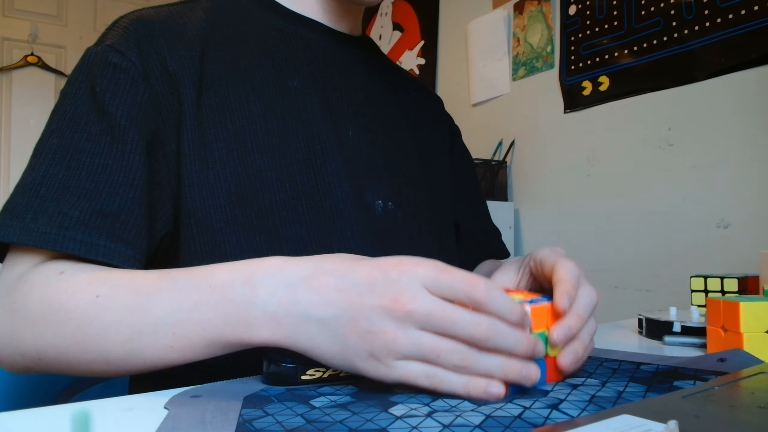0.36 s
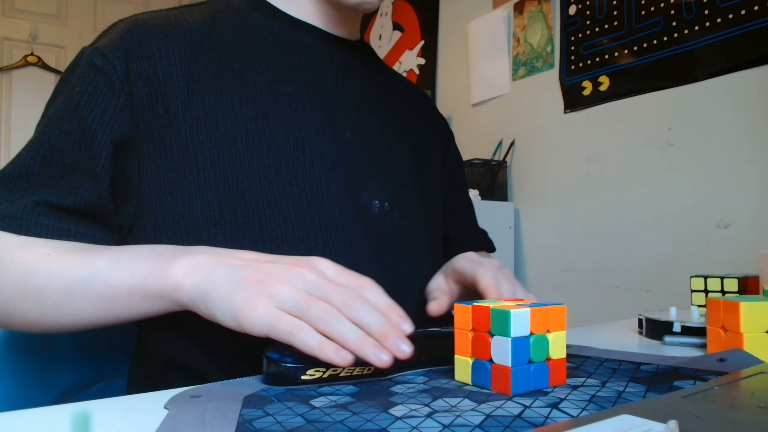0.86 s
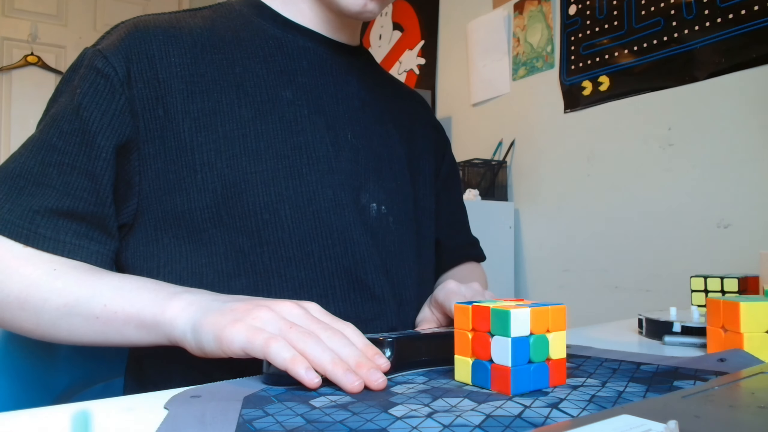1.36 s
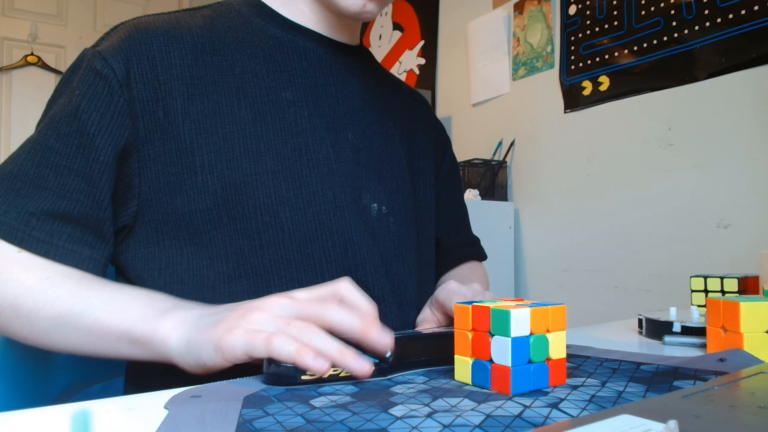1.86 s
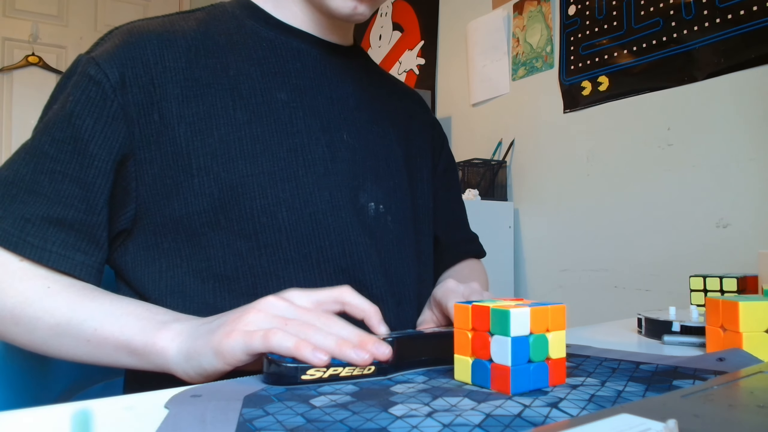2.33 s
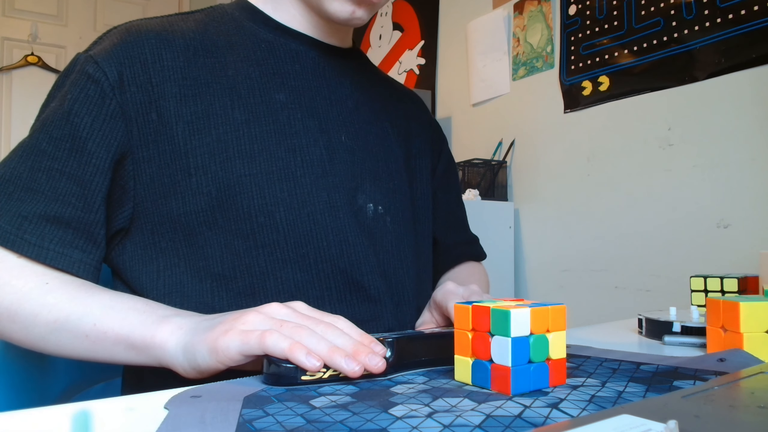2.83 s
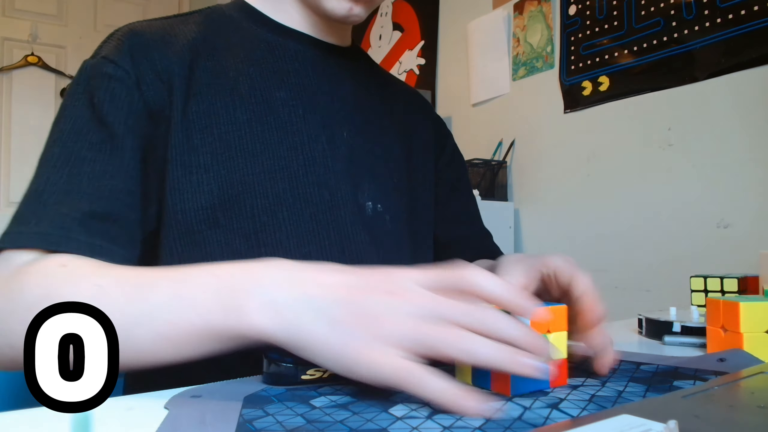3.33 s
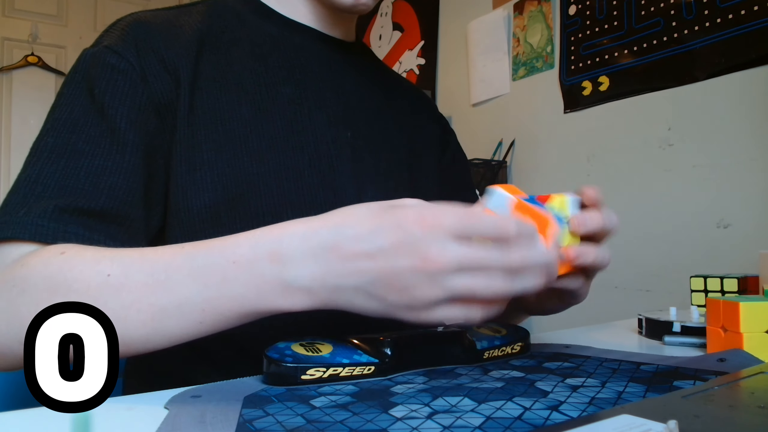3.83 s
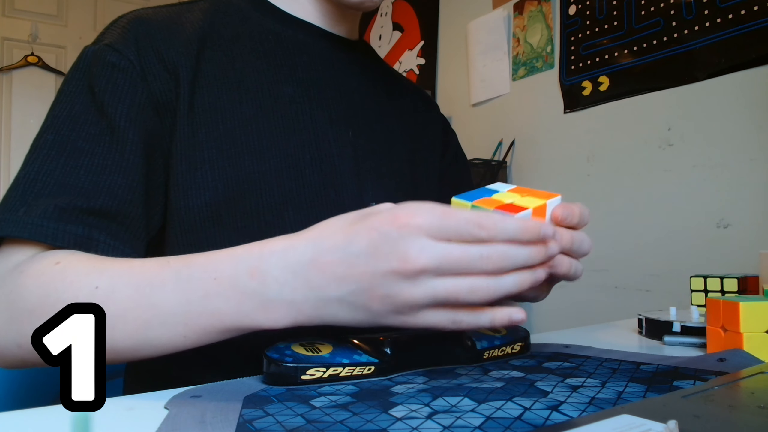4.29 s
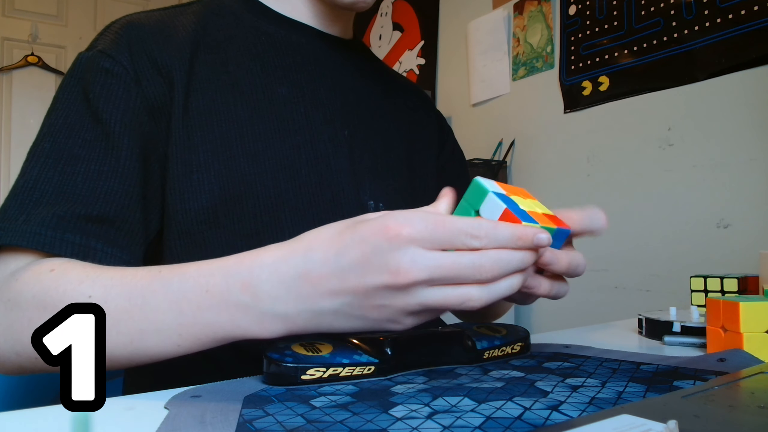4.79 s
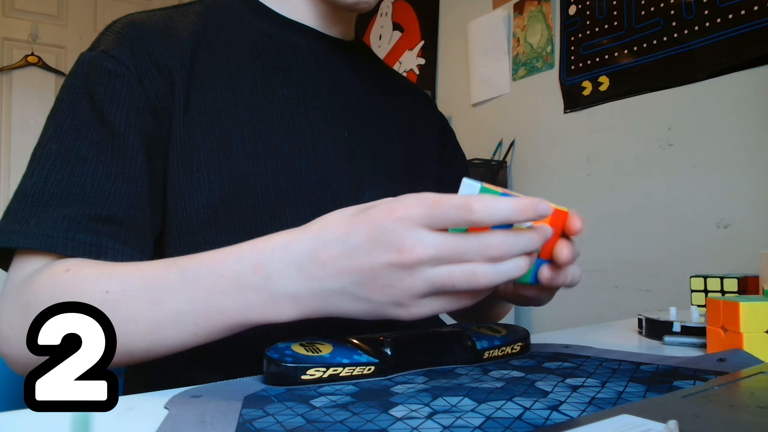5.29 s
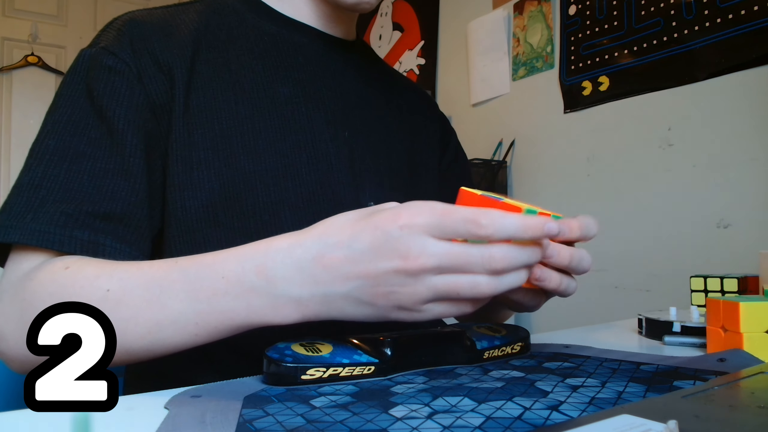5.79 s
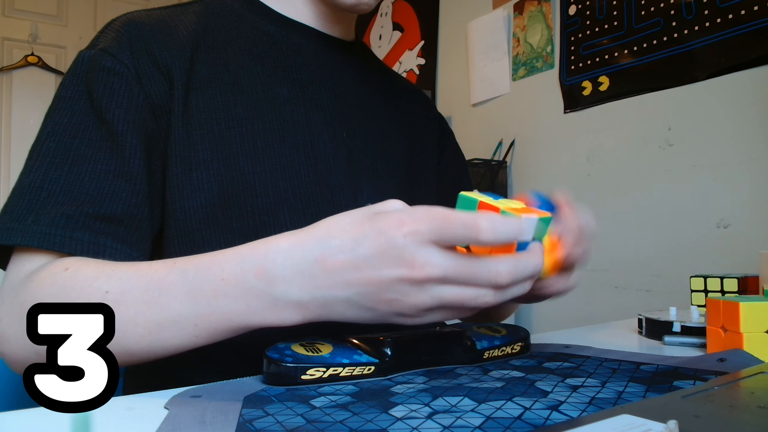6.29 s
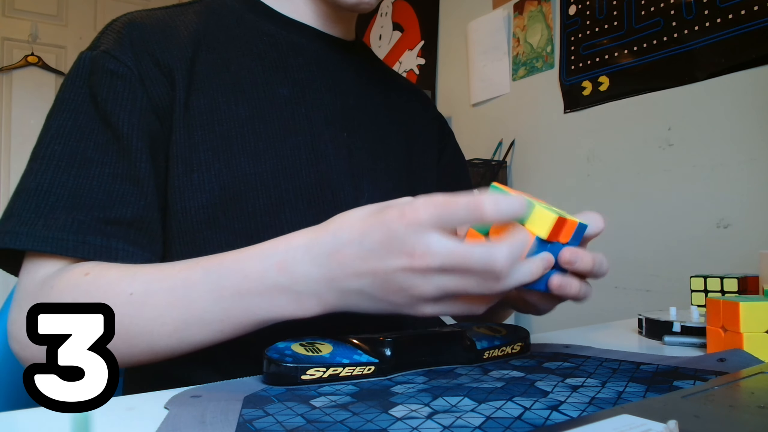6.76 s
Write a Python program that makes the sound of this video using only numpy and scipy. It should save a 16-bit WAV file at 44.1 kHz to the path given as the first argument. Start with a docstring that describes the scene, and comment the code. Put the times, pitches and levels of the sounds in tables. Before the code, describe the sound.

Close desk microphone, small room, quiet steady fan. First a dull double thump as a cube is put down, then a soft bump and skin rustle. After a quiet second come several hard finger taps and one strong low knock. Another lull, a brushing grab, then rapid crisp plastic snaps and short gritty scrapes, growing denser and louder towards the end.

```python
"""Over a faint fan hiss a plastic puzzle cube is set down on a desk mat, hands and fingertips land on a
timer pad, then the cube is snatched up and its layers are flicked round in bursts of sharp clicks.
Knocks are ragged contacts ringing plastic modes; scraping rings the cube's modes with grainy noise;
skin and sleeves are grainy filtered noise; thumps and leaning arms ring desk modes, with deep wobbles below.
A small furnished room; the microphone stands on the same desk."""
import sys
import numpy as np
from scipy import signal
from scipy.fft import rfft, irfft, next_fast_len
from scipy.io import wavfile
from scipy.ndimage import uniform_filter1d

SR = 44100
rng = np.random.default_rng(int(sys.argv[2]) if len(sys.argv) > 2 else 0)


def file_out(sig):
    """Save sig as 16-bit WAV at sys.argv[1]."""
    # one column per channel
    cols = np.atleast_2d(sig).T
    # limit, then scale
    lim = np.clip(cols, -1, 1)
    pcm = np.round(lim * 32767).astype(np.int16)
    wavfile.write(sys.argv[1], SR, pcm)


def ratio(d):
    """dB to gain"""
    e = np.asarray(d, float) / 20
    return 10 ** e


N = 314874

# cube body modes: (nominal frequency [Hz], relative level [dB], t60 [s])
CUBE_MODES = [(670, -12, 0.0013), (1121, 0, 0.022), (1450, 12, 0.0022), (2350, 7, 0.0067),
              (2500, 4, 0.0027), (3473, 4, 0.0094), (4260, 6, 0.005), (4906, 5, 0.0018),
              (5523, 4.5, 0.0058), (6037, -1, 0.0087), (6950, 0.5, 0.006), (7130, -10, 0.0052)]
# layer flicks: (loudest moment [s], relative level [dB], time to die 20 dB [s], under 5 ms swells as 5 ms)
FLICKS = [(3.6, -30.5, 0.1), (3.632, -20.5, 0.0758), (3.88, -26, 0.0551), (4.03, -34, 0.08),
          (4.45, -47.5, 0.86), (4.5, -33.5, .045), (4.583, -24.5, 0.02), (4.97, -42.5, 0.34),
          (5.035, -14.5, 0.05), (5.222, -23.5, 0.035), (5.43, -25, 0.07), (5.48, -13.5, 0.0075),
          (5.557, -30, 0.0568), (5.66, -35, 0.02), (5.91, -30, 0.02), (6.07, -45, 0.35), (6.3, -11, -0.07),
          (6.385, -36, 0.22), (6.455, -19, 0.0231), (6.68, -27, -0.02), (6.72, -38, 0.18),
          (6.82, -23, 0.0358), (7.0, -32, 0.11), (7.14, -25, -0.61)]
FLICK_RISE = 0.4  # rise time over fall time
HANDS_ON_TIMER_S, HANDS_OFF_TIMER_S = 1, 3.3


def evened(x):
    """Scales to rms 1."""
    return x / np.sqrt(np.mean(x ** 2) + 1e-20)


def read(points, hz):
    """Reads a curve of (Hz, value) on a log-frequency axis."""
    f, value = np.transpose(points)
    return np.interp(np.log(hz + 1), np.log(f + 1), value)


def add(mix, start_s, sound):
    """Mixes a sound in at start_s."""
    part = mix[max(round(start_s * SR), 0):][:len(sound)]
    part += sound[:len(part)]


def rings(modes, size):
    """One exponentially dying sine a mode."""
    hz, db, t60_s = np.transpose(modes)[:, :, None]
    t = np.arange(size) / SR
    return ratio(db - 60 * t / t60_s) * np.sin(2 * np.pi * hz * t)


def coloured(x, points):
    """Filters through a spectrum of (Hz, dB)."""
    size = next_fast_len(x.shape[-1] + 4096)
    gain = ratio(read(points, np.fft.rfftfreq(size, 1 / SR)))
    return irfft(rfft(x, size) * gain, size)[..., :x.shape[-1]]


def swells(rows, rise, rest_db):
    """Gain of a source at rest that swells to each row's level and dies away again, powers adding."""
    peak_s, db, fall_s = np.transpose(rows)[:, :, None]
    t = np.arange(0, N / SR + .002, .001)
    late = (t - peak_s) / np.maximum(fall_s, .005)
    power = ratio(db - 20 * np.maximum(late, -late / rise)) ** 2
    gain = np.sqrt(ratio(rest_db) ** 2 + power.sum(0))
    return np.interp(np.arange(N) / SR, t, gain)


def fan():
    """Steady hiss with a few tones wavering in phase."""
    # hiss shape: (frequency [Hz], relative density [dB per Hz])
    hiss_shape = [(59, -35.5), (100, 0.5), (180, -4.5), (403, -11), (458, -11), (887, -15), (972, -13),
                  (1430, -15), (1880, -25), (2340, -26.5), (3640, -45), (5860, -41.5), (8010, -62),
                  (10400, -86), (17600, -120)]
    # tones: (frequency [Hz], rms level [dB])
    tone_rows = [(614, -73.5), (888, -70.5), (1061, -77.5), (1453, -80.5), (1733, -74.5)]
    hiss_rms_db, waver_rad = -54.5, 0.51
    t = np.arange(N) / SR
    waver = evened(uniform_filter1d(rng.standard_normal((len(tone_rows), N)), 6000)) * waver_rad
    tones = np.zeros(N)
    for (hz, db), phase in zip(tone_rows, waver):
        tones += ratio(db) * np.sqrt(2) * np.sin(2 * np.pi * hz * t + phase)
    return ratio(hiss_rms_db) * evened(coloured(rng.standard_normal(N), hiss_shape)) + tones


def knocks(rows, modes):
    """Each knock is a ragged contact of a millisecond or two that rings the struck thing its own way."""
    # where body modes end and snap modes start: [Hz]
    families_hz = [2000, 4600]
    contact_ms, contact_spread = 1.67, 0.28  # typical value, log spread
    softer_per_db = .01  # hollow knocks touch longer, by this share a dB of body
    piece_spread = .08  # pieces and touched spots differ: log spread of mode frequencies
    modes = np.repeat(modes, repeats=2, axis=0)  # both touching parts ring, each tuned its own way
    out, count = np.zeros(N), len(modes)
    families = np.searchsorted(np.transpose(modes)[0], families_hz)
    chance = rng.standard_normal((len(rows), 401 + 2 * count))
    t_ms = np.arange(400) / SR * 1000
    for (start_s, snap_db, body_db, middle_db), draw in zip(rows, chance):
        shift = np.exp(piece_spread * draw[-count:])
        tuned = [(hz * k, db, t60_s) for (hz, db, t60_s), k in zip(modes, shift)]
        ring = rings(tuned, size=1100)
        touch_ms = contact_ms * np.exp(contact_spread * draw[400] + softer_per_db * body_db)
        u = t_ms / np.clip(touch_ms, .7, 4)
        contact = draw[:400] * u * np.exp(-3 * u)
        rung = irfft(rfft(contact, 1500) * rfft(ring, 1500), 1500)
        # every mode takes its usual share of the energy, give or take a little
        usual = np.linalg.norm(ring, axis=1) / np.linalg.norm(rung, axis=1)
        rung *= (ratio(1.7 * draw[401:-count]) * usual)[:, None]
        for over_db, part in zip((body_db, middle_db, 0), np.split(rung, families)):
            family = part.sum(0)
            add(out, start_s, ratio(snap_db + over_db) * family / abs(family).max())
    return out


def catches():
    """Pieces catch at random around the height of every flick, as loud as the layer scrapes just then."""
    per_flick, level_db, spread_db = 3, -8.5, 3  # level over the flick's
    body_over_db, middle_over_db = 2, 0.5  # usual colour over the snap
    reach = .6  # how far they stray, in fall times
    peak_s, db, fall_s = np.repeat(FLICKS, per_flick, axis=0).T
    when, snap, body, middle = rng.standard_normal((len(peak_s), 4)).T
    late = reach * when
    snap_db = db + level_db - 20 * abs(late) + spread_db * snap
    # a negative fall time mirrors the stray in time
    start_s = peak_s + fall_s * late * np.where(late < 0, FLICK_RISE, 1)
    return list(zip(start_s, snap_db, body_over_db + spread_db * body, middle_over_db + spread_db * middle))


def clicks():
    """Knocks ring the timer shell while the hands rest there, the cube before and after."""
    # clearest knocks: (time [s], relative snap level [dB], hollow body over snap [dB], middle over snap [dB])
    rows = [(0.0684, -59, -2, 0), (0.0884, -55, 3, 9), (0.104, -61, 7, 1), (0.1354, -56.5, 1, 3),
            (0.168, -55.5, -4, -6), (0.2104, -58.5, 21.5, 1), (0.2244, -63, 19, 6), (0.2376, -71, 12, 7),
            (0.2687, -59.5, 8, 0), (0.2824, -52, -3, -12), (0.439, -53, 13, 8), (0.4514, -45.5, 11, 5),
            (0.483, -55, 16.5, -6), (1.095, -55.5, 5, 5), (1.104, -47, 9, -2), (1.1432, -54, 11, -8),
            (1.1566, -54, 13.5, -5), (2.0418, -25.5, 9, -2), (2.062, -49.5, 22.5, 10.5),
            (2.0993, -18.5, -4, 1), (2.1501, -15.5, -6, -11), (2.207, -51.5, 20.5, 3.5),
            (2.2734, -59, 13, 0), (2.2801, -57.5, 17.5, 7), (2.362, -38, 10.5, 8),
            (2.401, -19.5, -1.5, 1.5), (2.6136, -53.5, 18.5, 8), (2.6293, -60, 13, 13), (3.5554, -49, 1, 6),
            (3.583, -31, -8, -6), (3.5908, -30, -9, -6), (3.6015, -27, -17, -6.5), (3.6065, -34.5, -4, -3),
            (3.6296, -11.5, -11, -5), (3.6362, -17.5, -24, 0.5), (3.671, -29.5, -20, 0),
            (3.7124, -36.5, 5, -6), (3.8171, -37.5, -14, -2.5), (3.8646, -39.5, -8, 4),
            (3.8736, -24, -24, -2), (3.8994, -38, -14, 7.5), (4.0081, -42.5, 11.5, -9),
            (4.017, -30.5, 0.5, -6), (4.0349, -30, -11, -13), (4.19, -47, -2, -13),
            (4.4393, -40.5, 13, -12), (4.4484, -41, 4, 6.5), (4.4758, -32.5, -4, 10), (4.4978, -28, 2, 4.5),
            (4.5177, -33.5, 6.5, -1), (4.568, -33.5, 7.5, 4), (4.583, -31, -10, -1.5), (4.5983, -31, 6, 3),
            (4.6817, -42, -5, -2), (4.7026, -42, -16, -8), (4.784, -47, -6, -4), (4.794, -43.5, 0, 3),
            (4.9132, -33.5, -21, -10), (4.9453, -32, -1, -12), (4.9552, -24, -1.5, -4),
            (4.9825, -24, 4, -3), (5.0087, -31.5, -3, -8.5), (5.0205, -17.5, -17, -4),
            (5.031, -12, -17, -13), (5.0373, -12.5, -12.5, -10), (5.051, -11.5, -23, -17),
            (5.0653, -27, 4.5, -11), (5.0903, -31.5, -4, 0), (5.0997, -33.5, -4, -5), (5.111, -33, -5, -1),
            (5.1766, -41.5, -3, -8), (5.205, -28, -1, -6), (5.215, -21.5, -4, -5),
            (5.22, -13.5, -15.5, -5.5), (5.2282, -17, -13, -9), (5.3024, -45, -8, 1),
            (5.4135, -32.5, 3, -7), (5.4169, -32, 0, 3.5), (5.434, -31, -5, 1.5), (5.46, -16, -9, -4),
            (5.476, -5.5, -27, -18.5), (5.4849, 0, -18, -12), (5.4928, -21.5, -16, -4),
            (5.5027, -24, -26, -6), (5.557, -20, -22, 2), (5.657, -29.5, 4, -29), (5.7302, -42, 8, -22),
            (5.7695, -47.5, -8, -6), (5.8896, -38.5, 5, -8), (5.898, -28, 0, -5), (5.909, -22.5, -27, -25),
            (5.9249, -35, 7, -8), (6.0524, -31.5, -10, -23), (6.0633, -27.5, -7.5, -29),
            (6.0937, -36, -2, -31), (6.1056, -42, -3, -21), (6.2416, -42.5, -3, -12),
            (6.2679, -34, -3.5, -3.5), (6.2788, -25, -3, -7), (6.2897, -26.5, -25, -8.5),
            (6.3052, -10.5, -20.5, -28), (6.3698, -30, -3, 1.5), (6.3884, -27.5, -21, 4.5),
            (6.439, -22.5, -1.5, -12.5), (6.448, -17.5, -11, -13), (6.4528, -15, -9, -1),
            (6.4662, -5.5, -22.5, -5), (6.4726, -19.5, -18, -11), (6.4954, -22.5, -1.5, -9),
            (6.5176, -25.5, -16, 3), (6.645, -45, 4, -5), (6.6667, -24, 4, -6), (6.6731, -18, -0.5, -4.5),
            (6.6809, -7, -8.5, -6), (6.6945, -10, -11.5, -14), (6.7074, -19.5, -22.5, -19),
            (6.7188, -3, -19.5, -13.5), (6.7313, -15, -5, 0), (6.792, -22, -18, -10),
            (6.8096, -25.5, -1, -5), (6.8264, -22.5, 4.5, -2.5), (6.8413, -33, -9, -14),
            (6.8939, -44, 3, 7.5), (6.9578, -47, 1, -3), (6.9835, -39, 10, -13), (6.9882, -26, -1, 0.5),
            (7.0009, -16, -10, -2), (7.0137, -25.5, 7.5, -4), (7.0528, -35, -5, -0.5),
            (7.0694, -28, -5, -2), (7.1184, -35.5, 1.5, -3.5)]
    # timer shell modes: (nominal frequency [Hz], relative level [dB], t60 [s])
    timer_modes = [(1030, -9.5, 0.029), (1270, -6.5, 0.019), (1632, -2.5, 0.017), (2280, -10, 0.016),
                   (3260, -7.5, 0.0027), (3690, 4, 0.0074), (4710, 2, 0.0047), (5800, 2.5, 0.0038),
                   (6290, 0.5, 0.0039), (7450, -8, 0.0045)]
    on_timer = [row for row in rows if HANDS_ON_TIMER_S < row[0] < HANDS_OFF_TIMER_S]
    on_cube = [row for row in rows if not HANDS_ON_TIMER_S < row[0] < HANDS_OFF_TIMER_S]
    cube = knocks(on_cube, CUBE_MODES) + knocks(catches(), CUBE_MODES)
    return cube, knocks(on_timer, timer_modes)


def rustle():
    """Skin and sleeves brushing: soft airy noise with a light grain."""
    # spectrum: (frequency [Hz], relative level [dB])
    skin = [(600, -29.5), (1500, 3.5), (2500, 0), (4000, -2), (6000, -6.5), (8000, -7)]
    # strokes: (loudest moment [s], level [dB], time to die 20 dB [s], at least 5 ms is used)
    strokes = [(.385, -59, 0.27), (.47, -68, -1.04), (1.15, -40, -0.1532), (1.87, -56, -3.1),
               (2.37, -60.5, .5), (2.5, -57.5, 0.27), (3.15, -53.5, 0.14), (3.4, -55, 0.18),
               (3.5, -42, -0.05), (3.6, -56, 0.06), (4.3, -63, -1.5), (4.75, -62.5, -3.2),
               (5.18, -52, -0.15), (5.35, -58, -2.7), (5.85, -50, -0.7), (6.2, -68.5, 1.9),
               (7.14, -49, -1.8)]
    grain = ratio(1.2 * evened(uniform_filter1d(rng.standard_normal(N), 200)))
    airy = evened(grain * coloured(rng.standard_normal(N), skin))
    return swells(strokes, rise=0.51, rest_db=-69) * airy


def desk():
    """Soft pushes ring the desk modes that the struck spot favours; leaning arms keep them murmuring."""
    # desk modes: (frequency [Hz], relative level [dB], t60 [s])
    desk_modes = [(82, 7.5, 0.23), (127.9, 8, 0.11), (168, 0, 0.089), (200, 0.5, 0.13), (228, 0.5, 0.093),
                  (266.4, -5, 0.11), (303.4, -2, .12), (410.6, -4, 0.12), (452.7, -4, 0.09),
                  (659, -3, 0.04)]
    # blows: (time [s], peak level [dB], push [ms], favoured frequency [Hz], spread [octaves], at least 0.1 is used)
    blows = [(0.45, -2.5, 1.07, 138, 0.39), (.487, -9.5, 2.8, 139, 0.39), (0.616, -34.5, 6.3, 100, 0.68),
             (0.841, -30, 0.76, 200, 1.2), (1.0928, -12.5, 4.1, 99, 0.38), (1.112, -17.5, 5.7, 110, 1),
             (1.138, -21, 2.7, 109, 0.42), (1.151, -25, 2.2, 150, 0.67), (1.247, -36, 1.4, 200, 0.65),
             (1.96, -23, 5.4, 106, 0.53), (2.042, -16.5, 3.2, 275, 0.59), (2.1, -17.5, 1.9, 270, 0.75),
             (2.113, -26, 1.36, 224, 0.89), (2.15, -24.5, 1.6, 293, .8), (2.189, -23, 5.7, 282, 0.32),
             (2.208, -25.5, 1.8, 227, 0.96), (2.235, -26, 3, 252, 0.41), (2.3615, 1, 3.2, 136.7, 0.59),
             (2.4, -10.5, 0.81, 240, 0.62), (2.5, -22.5, 1.5, 104, 0.33), (2.581, -32, 6.4, 130, 1.3),
             (2.806, -33.5, 3.5, 82, 0.54), (2.968, -31, 10.2, 228, 0.077), (2.991, -25.5, 2.3, 228, 0.11),
             (3.15, -31, 2.9, 132, 0.68), (3.171, -30, 1.9, 90, 0.89), (3.424, -12.5, 2.7, 160.5, 0.25),
             (3.926, -31.5, 2.6, 82, 0.53)]
    # arms shifting: (loudest moment [s], level [dB], time to die 20 dB [s], at least 5 ms is used,
    # upper modes over the lowest two [dB])
    leans = [(.5, -24.5, 0.15, -25), (.87, -38.5, -0.05, 3.5), (1.112, -45.5, 0.36, -0.5),
             (2.17, -43.5, 0.66, -3.5), (2.4, -51, 1.36, -5.5), (2.5, -49, 0.2, 8.5),
             (2.98, -44.5, -0.14, 11.5), (3.169, -40.5, 0.37, -8), (3.421, -35, 0.19, -14),
             (3.55, -49.5, -1.8, -3), (5.551, -50, 0.3, -6.5), (6.14, -54.5, 0.5, -4.5),
             (6.72, -47, 0.37, -11)]
    # deep wobbles of air and desk: (loudest moment [s], level [dB], time to die 20 dB [s], at least 5 ms is used)
    wobbles = [(.44, -51.5, 0.8), (1.19, -32, -0.1), (1.55, -36.5, 0.3), (1.99, -43, 1), (2.5, -41.5, 0.1),
               (3.2, -41.5, 0.8), (3.5, -31, -0.3), (4.14, -47.5, 1), (5.55, -46, 1.3), (6.17, -36.5, 0.1),
               (6.72, -41.5, 0.55), (7.14, -41.5, 0.3)]
    out, modes = np.zeros(N), rings(desk_modes, size=SR // 2)
    onset_s = 0.0017  # desk modes swell up softly rather than starting at once
    modes *= 1 - np.exp(-np.arange(SR // 2) / (onset_s * SR))
    stand = signal.butter(4, 69.4, "high", fs=SR, output="sos")  # the stand passes no slow sway
    for start_s, db, push_ms, favoured_hz, octaves in blows:
        push = np.hanning(max(round(push_ms / 1000 * SR), 3))
        away = np.log2(np.transpose(desk_modes)[0] / favoured_hz)
        share = np.exp(-.5 * (away / max(octaves, .1)) ** 2)
        thump = signal.sosfilt(stand, signal.fftconvolve(push, share @ modes))
        add(out, start_s, ratio(db) * thump / abs(thump).max())
    lowest = [row[:3] for row in leans]
    upper = [(peak_s, db + upper_db, fall_s) for peak_s, db, fall_s, upper_db in leans]
    for rows, rest_db, part in zip((lowest, upper), (-55.5, -57), np.split(modes, [2])):
        murmur = signal.oaconvolve(rng.standard_normal(N), part.sum(0))[:N]
        out += swells(rows, rise=0.55, rest_db=rest_db) * evened(signal.sosfilt(stand, murmur))
    deep_shape = [(12, -39.0), (22, -7), (45, -6.0), (70, -8.5), (100, -37.0), (200, -87)]  # (Hz, dB)
    deep = evened(coloured(rng.standard_normal(N), deep_shape))
    return out + swells(wobbles, rise=0.4, rest_db=-51) * deep


def slide():
    """Layers scraping round: a hiss and many tiny catches of uneven size ring the same pieces."""
    catches_per_s, scrape_db = 700, -10.0
    size = ratio(3.5 * np.minimum(rng.exponential(1, N), 4))
    tiny = (rng.random(N) < catches_per_s / SR) * size
    rub = rng.standard_normal(N) * (.5 + 0.53 * evened(uniform_filter1d(tiny, 30)))
    ring = ratio(np.linspace(.1, -.1, len(CUBE_MODES))) @ rings(CUBE_MODES, size=300)
    scrape = evened(signal.oaconvolve(rub, ring)[:N])
    held = np.arange(N) > HANDS_OFF_TIMER_S * SR  # silent until the cube is in hand
    return held * ratio(scrape_db) * swells(FLICKS, FLICK_RISE, rest_db=-70.5) * scrape


def room(x, tail_db):
    """A few early echoes, then three diffuse tails that take turns so that no two knocks ring alike."""
    # reverberation: (frequency [Hz], t60 [s])
    decay = [(300, .2), (1000, 0.15), (3000, 0.17), (7000, 0.15)]
    # desk, wall and shelf: (delay [ms], level [dB])
    echoes = [(2.5, -17), (6, -22.5), (10, -19), (13, -22.5)]
    turn_hz, onset_s = 7, 0.005
    out = x.copy()
    for delay_ms, db in echoes:
        add(out, delay_ms / 1000, ratio(db) * x)
    hz, t, z = signal.stft(rng.standard_normal((3, SR // 2)), SR, nperseg=128)
    fading = z * ratio(-60 * t / read(decay, hz)[:, None])
    tails = signal.istft(fading, SR, nperseg=128)[1]
    tails *= np.clip(np.arange(tails.shape[1]) / (onset_s * SR), 0, 1)
    for k, tail in enumerate(tails):
        turn = np.sqrt(2 / 3) * np.cos(2 * np.pi * (np.arange(N) / SR * turn_hz + k / 3))
        out += ratio(tail_db) * signal.oaconvolve(x * turn, tail / np.linalg.norm(tail))[:N]
    return out


def scene():
    """Cube, timer and skin in the room, desk straight into the microphone stand, fan beneath."""
    small = signal.butter(3, 410, "high", fs=SR, output="sos")  # small pieces radiate no bass
    knock_gain = ratio(1)  # overall level of the cube and timer knocks, from dB
    cube, timer = clicks()
    pieces = signal.sosfilt(small, knock_gain * cube + slide())
    near = pieces + knock_gain * timer + rustle()
    return (room(near, tail_db=-9.0) + desk() + fan())[None]


def roll_off(x):
    """The treble ends steeply here."""
    return signal.sosfilt(signal.butter(12, 8160, fs=SR, output="sos"), x)


def record(dry):
    """Narrow-band microphone, then a ceiling that rounds off the loudest peaks."""
    # microphone response: (frequency [Hz], gain [dB])
    response = [(20, -6.5), (6500, 5), (7200, -1), (7700, -9.5), (8100, -21.5), (8600, -69.5), (16000, -78)]
    ceiling = .7
    heard = coloured(dry, response)
    mix = heard / (1 + (heard / ceiling) ** 4) ** (1 / 4)
    return roll_off(mix)


dry = scene()
out = record(dry)
file_out(out)
```